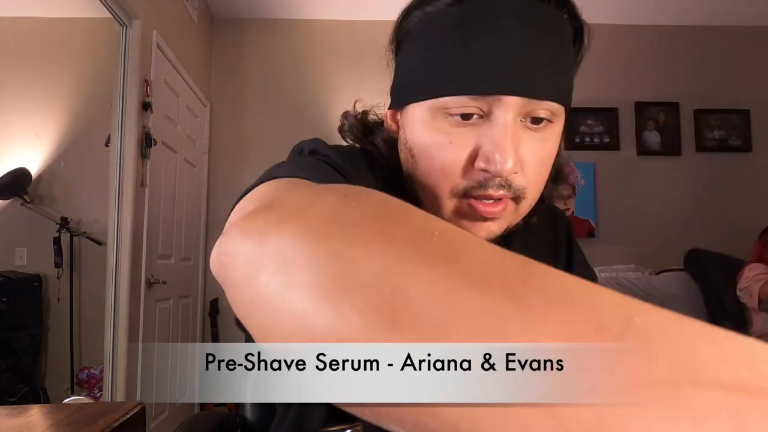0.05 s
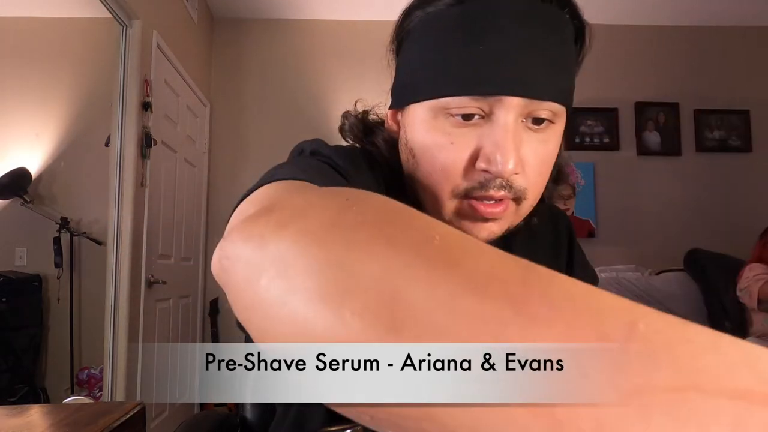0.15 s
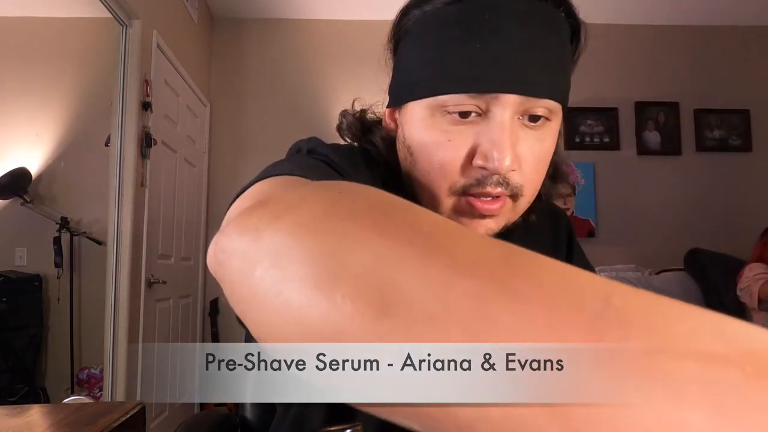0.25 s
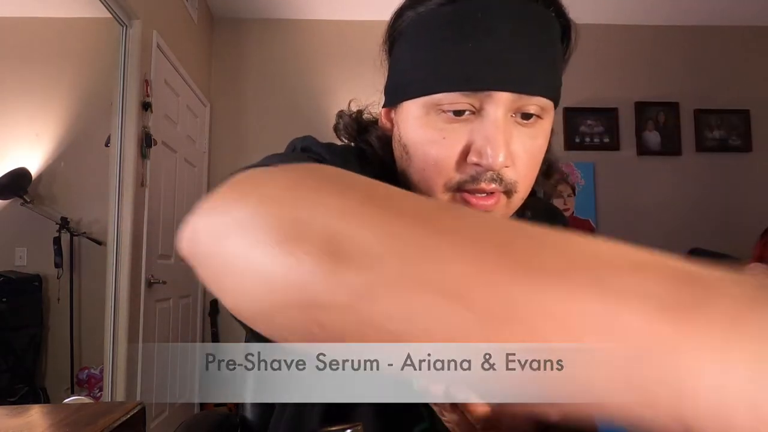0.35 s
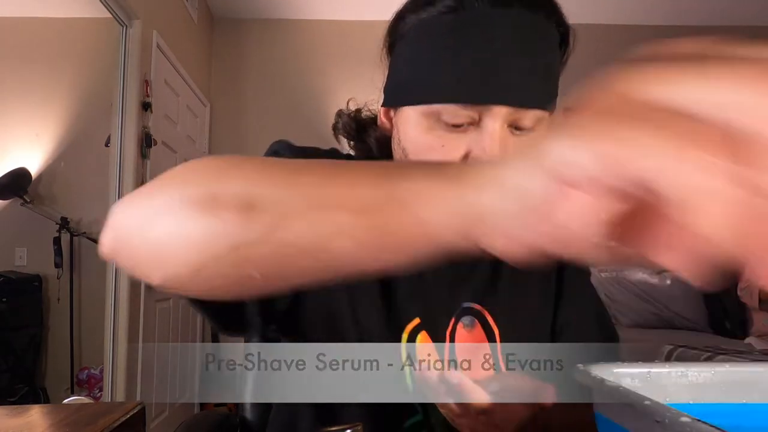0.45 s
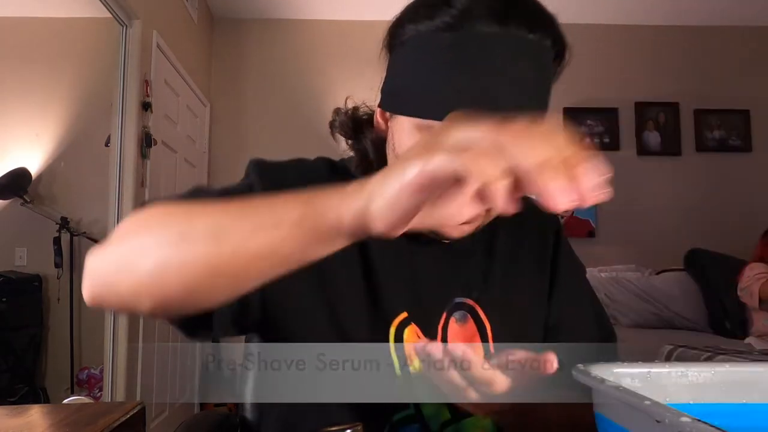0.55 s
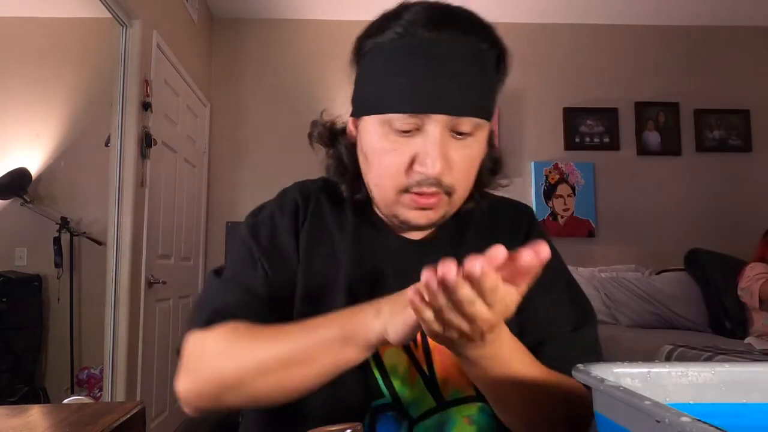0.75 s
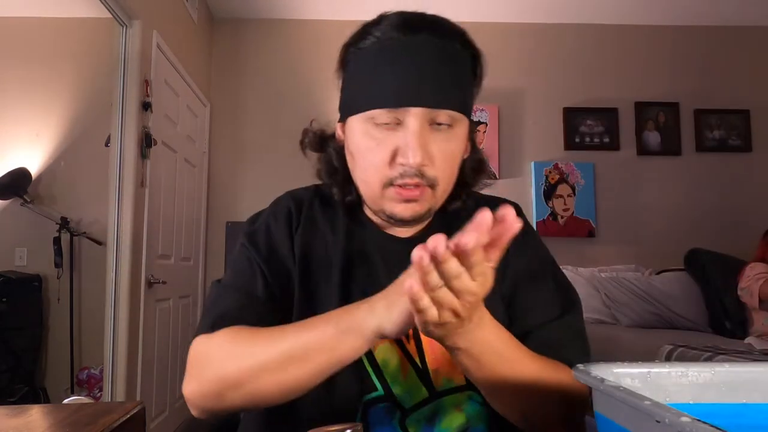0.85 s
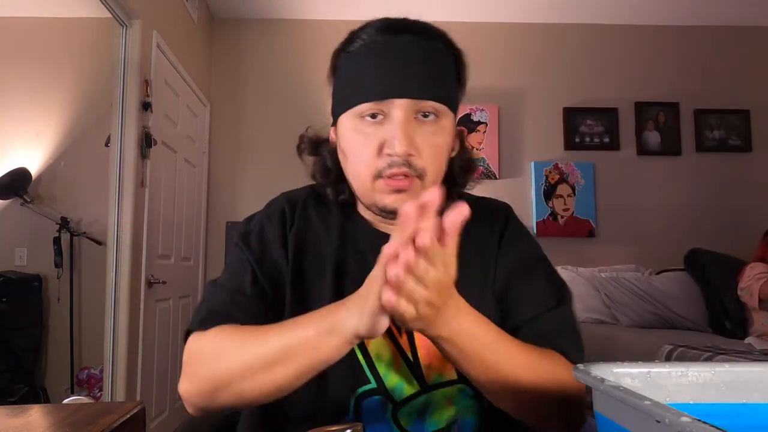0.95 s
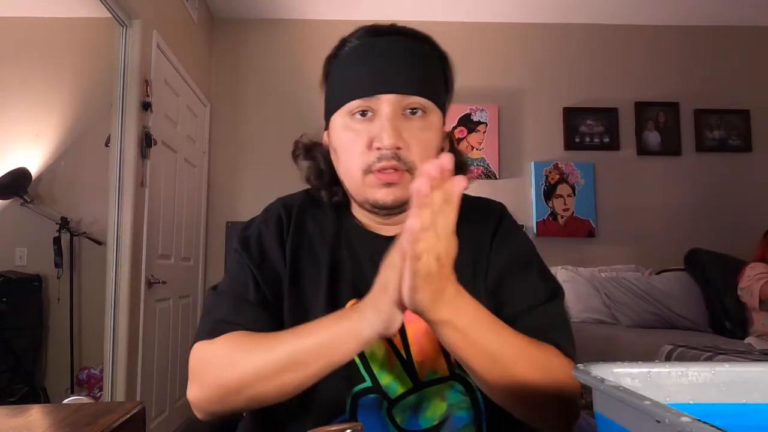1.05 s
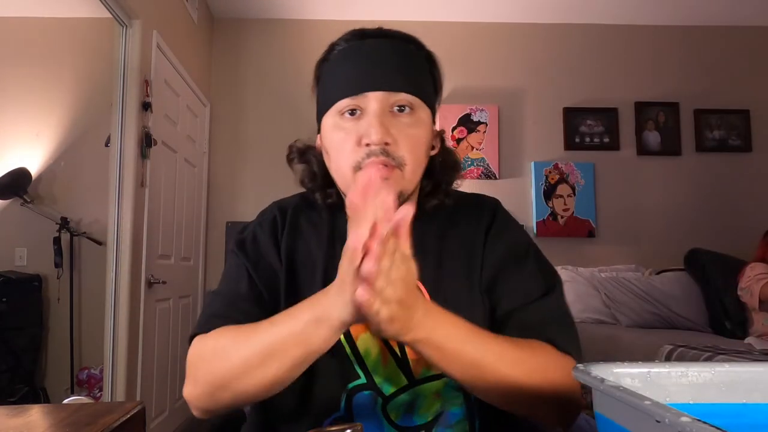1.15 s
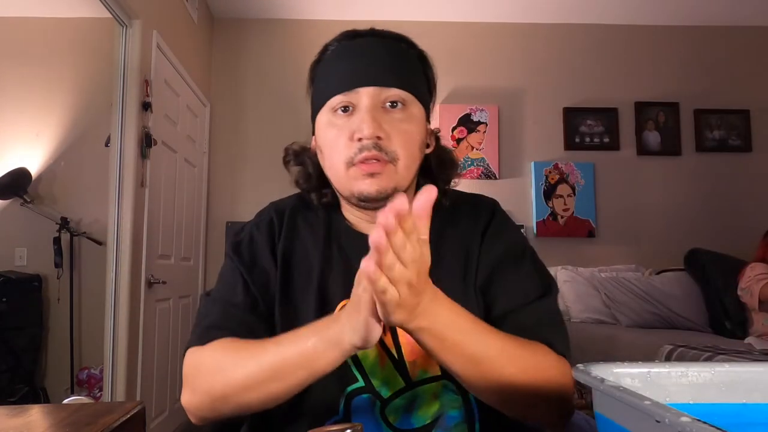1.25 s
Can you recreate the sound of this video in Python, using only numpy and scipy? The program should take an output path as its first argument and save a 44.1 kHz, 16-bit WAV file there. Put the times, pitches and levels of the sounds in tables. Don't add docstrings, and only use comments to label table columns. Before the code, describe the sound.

Loud hollow knock of a glass bottle set down on wood, several smaller wobbling thuds, a short lull, then soft wet skin rubbing with tiny liquid smacks, heard close in a quiet room.

```python
import sys
import numpy as np
from scipy import signal
from scipy.fft import rfft, irfft
from scipy.io import wavfile
from scipy.ndimage import uniform_filter1d, map_coordinates

SR = 44100
rng = np.random.default_rng(int(sys.argv[2]) if len(sys.argv) > 2 else 0)


def voltage_ratio(level):
    return 10 ** (np.asarray(level, float) / 20)


def master_out(mix):
    frames = np.transpose(np.atleast_2d(mix))
    ceiling = np.clip(frames, -1, 1)
    pcm = np.round(ceiling * 32767).astype(np.int16)
    wavfile.write(sys.argv[1], SR, pcm)


N = 57330
T = np.arange(N) / SR


def unit(x):
    return x / np.sqrt(np.mean(x ** 2) + 1e-20)


def along(points, hz):
    f, value = np.transpose(points)
    return np.interp(np.log(hz + 1), np.log(f + 1), value)


def envelope(points):
    return np.interp(T, *np.transpose(points))


def wobble(rate_hz):
    return map_coordinates(rng.standard_normal(200), [T * rate_hz])


def noise(spectrum, patchy_db):
    _, _, z = signal.stft(rng.standard_normal(N), SR, nperseg=256)
    field = uniform_filter1d(rng.standard_normal(z.shape), 4, 0)
    field = unit(uniform_filter1d(field, 8, 1))
    x = signal.istft(z * voltage_ratio(patchy_db * field), nperseg=256)[1][:N]
    colour = voltage_ratio(along(spectrum, np.fft.rfftfreq(N, 1 / SR)))
    return unit(irfft(rfft(x) * colour, N))


def ring(modes, start_s, rise_s):
    hz, db, t60_s = np.transpose(modes)[:, :, None]
    t = np.maximum(T - start_s, 0)
    sines = voltage_ratio(db - 60 * t / t60_s) * np.sin(2 * np.pi * hz * t)
    return sines.sum(0) * (1 - np.exp(-t / rise_s)) ** 2


def blips(s, gain, hz, cycles):
    length = 400
    at, t = np.round(s * SR).astype(int), np.arange(length) / SR
    u = t * (hz / cycles)[:, None] * 4
    waves = gain[:, None] * np.e * u * np.exp(-u) * np.sin(2 * np.pi * hz[:, None] * t)
    where = at[:, None] + np.arange(length)
    return np.bincount(where.ravel(), waves.ravel(), N + length)[:N]


# t/s, level/dB, thud f/Hz, hardness/dB, table drive/dB
CONTACTS = [(.102, -26.5, 473, -30, -13), (.112, -16.5, 500, -23, -32), (0.1236, -1.5, 390, 0.5, -3),
            (0.1314, -12, 329, -2.5, -15.5), (.175, -17.5, 366, -29.5, -16), (0.218, -27.5, 370, -24, 0),
            (0.2594, -16.5, 404, -11.5, 2), (0.288, -34, 300, -22, -6), (.333, -31, 300, -17, -3),
            (0.3628, -18.5, 355.4, -5.5, 1), (0.4167, -27.5, 375, 1, 9.5), (0.433, -29.5, 339, -22.5, -13),
            (0.4733, -18.5, 345, -6.5, -5), (0.49, -32, 300, 5.5, 6)]
FAVOURED_HZ = [300, 300, 218, 300, 250, 280, 160.5, 180, 200, 199, 169, 250, 262, 240]
# f/Hz, level/dB, t60/s
TABLE_LOW = [(120.7, -47.5, 0.46), (161.3, -11, 0.26), (194.1, -7.5, 0.24), (234.2, -16, 0.43),
             (286.6, -11, 0.19), (345, -21, 0.49), (369.5, 2, 0.043), (403.4, -24.5, .2)]
# f/Hz, level/dB, t60/s
TABLE_UPPER = [(486, -5.5, 0.042), (632, -16.5, 0.088), (692.3, -26.5, 0.098), (797, -20.5, .06),
               (894, -25.5, 0.14), (1016, -17, 0.043), (1200, -30, 0.067), (1300, -25, 0.064),
               (1515, -20.5, 0.035)]


def contacts():
    loss_db_per_octave = 3.5
    out = np.zeros(N)
    for (s, db, thud_hz, hard_db, drive_db), near_hz in zip(CONTACTS, FAVOURED_HZ):
        low = [(hz, level - loss_db_per_octave * abs(np.log2(hz / near_hz)), t60)
               for hz, level, t60 in TABLE_LOW]
        thud = ring([(thud_hz, 0, 0.062)], s, rise_s=0.00063)
        table = voltage_ratio(drive_db) * ring(low, s, rise_s=0.0014)
        knock = voltage_ratio(hard_db) * ring(TABLE_UPPER, s, rise_s=0.00077)
        out += voltage_ratio(db) * (thud + table + knock)
    return out


# f/Hz, level/dB
CRACK = [(600, -120), (900, 9.5), (1500, -2.5), (2800, -16.5), (4500, -23), (7000, -42), (11000, -50.5),
         (15300, -75)]


def crack():
    start_s, level_db, t60_s, rise_s = 0.1235, -19.5, 0.071, 0.00082
    t = np.maximum(T - start_s, 0)
    decay = voltage_ratio(level_db - 60 * t / t60_s) * (1 - np.exp(-t / rise_s)) ** 2
    return decay * noise(CRACK, patchy_db=0.5)


# f/Hz, level/dB, t60/s
GLASS = [(2697, -12, .05), (3946, 0, .09), (4064, -12, .13), (4650, -16, .05), (5329, -17, .13),
         (5420, -22, .1), (6670, -20, .1), (6799, -18, .13), (7800, -30, .04)]
# t/s, level/dB
CLINKS = [
    (0.1238, -42.5),
    (.136, -37),
    (.149, -36.5),
]


def clinks():
    return sum(voltage_ratio(db) * ring(GLASS, s, rise_s=0.0019) for s, db in CLINKS)


def bottle():
    high_pass = signal.butter(3, 115, "high", fs=SR, output="sos")
    return signal.sosfilt(high_pass, contacts() + crack() + clinks())


# t/s, level/dB
DRAG = [(0, -56.5), (.04, -55), (.094, -51.5), (.11, -40.5), (.125, -68.5)]
# f/Hz, level/dB
DRAG_TONE = [(400, -120), (700, -8), (1300, -4), (1520, 0), (1850, -1.5), (2400, -19), (5000, -19.5),
             (9000, -47)]


def drag():
    rough_db = 1.5 * wobble(90)
    return voltage_ratio(envelope(DRAG) + rough_db) * noise(DRAG_TONE, patchy_db=0.5)


def grains():
    count, start_s, size_db, centre_hz, spread = 500, 0.7, 1.5, 3470, 0.62
    s = start_s + rng.random(count) * (T[-1] - start_s)
    gain = voltage_ratio(-size_db * np.log(rng.random(count) + 1e-9))
    hz = np.clip(centre_hz * np.exp(spread * rng.standard_normal(count)), 800, 13000)
    return unit(blips(s, gain, hz, cycles=np.full(count, 3.5)))


# f/Hz, level/dB per Hz
SKIN = [(290, -45), (500, -9.5), (656, -9.5), (1340, 0), (1860, -7.5), (2590, -4), (6450, -12), (9490, -20),
        (15200, -32.5)]
# middle t/s, length/s, level/dB
STROKES = [
    (0.829, 0.055, -60),
    (0.942, 0.08, -59),
    (0.977, 0.049, -56),
    (1.057, 0.051, -54.5),
    (1.104, 0.06, -59.5),
    (1.159, .06, -56),
    (1.277, 0.054, -50),
]
STROKE_HZ = [1500, 1220, 5500, 2430, 6600, 2660, 2000]


def rubbing():
    contact_db, start_s, rise_s = -58.5, 0.8, 0.165
    hollow_db, hollow_q = -2.5, 2
    skin = noise(SKIN, patchy_db=0.5) + voltage_ratio(-7) * grains()
    out = voltage_ratio(contact_db) * np.clip((T - start_s) / rise_s, 0, 1) * noise(SKIN, patchy_db=5)
    for (middle_s, length_s, db), hz in zip(STROKES, STROKE_HZ):
        hollow = unit(signal.lfilter(*signal.iirpeak(hz, hollow_q, SR), skin))
        stroke = np.exp(-((T - middle_s) / (length_s / 2)) ** 2)
        out += voltage_ratio(db - 4) * stroke * (skin + voltage_ratio(hollow_db) * hollow)
    return out * voltage_ratio(2 * wobble(70))


# t/s, peak level/dB, f/Hz, length/cycles
SMACKS = [(0.8045, -55.5, 7500, 9.2), (0.9784, -38.5, 4870, 20), (0.98, -47, 3960, 20),
          (1.024, -46, 2540, 6), (1.081, -45.5, 1365, 8.6), (1.0873, -28.5, 6300, 3.2),
          (1.088, -36.5, 8850, 4.3), (1.144, -59, 2650, 8), (1.18, -51, 6000, 4), (1.189, -37.5, 4500, 3.7),
          (1.188, -51, 1500, 5), (1.24, -56, 5500, 4)]


def smacks():
    s, db, hz, cycles = np.transpose(SMACKS)
    return blips(s, voltage_ratio(db), hz, cycles)


# f/Hz, t60/s
ROOM = [(200, 0.23), (1500, 0.56), (5000, 1), (12000, 0.067)]


def room(x):
    delay_s = 0.006
    hz, t, z = signal.stft(rng.standard_normal(SR // 2), SR, nperseg=256)
    decay = voltage_ratio(-60 * t / along(ROOM, hz)[:, None])
    tail = signal.istft(z * decay, SR, nperseg=256)[1]
    late = np.pad(x, (round(delay_s * SR), 0))
    return signal.fftconvolve(late, tail / np.linalg.norm(tail))[:N]


# t/s, level/dB
SWAY = [(0, -55), (.1, -50.5), (.6, -63.5), (.8, -59.5), (1, -55), (1.15, -56.5), (1.3, -54.5)]
# f/Hz, level/dB
SWAY_TONE = [(90, -120), (120, -5), (160, -1), (200, -2.5), (280, -8), (420, -13), (600, -21), (800, -120)]


def sway():
    return voltage_ratio(envelope(SWAY) + 2.5 * wobble(32)) * noise(SWAY_TONE, patchy_db=-0.5)


# t/s, level/dB
BUMPS = [(0, -67), (.6, -74), (.72, -60), (.82, -64), (.86, -94), (1.02, -84), (1.1, -54), (1.3, -73)]
# f/Hz, level/dB
BUMP_TONE = [(15, -21.5), (30, -18.5), (60, -19), (115, -2), (150, -8), (220, -120)]


def bumps():
    return voltage_ratio(envelope(BUMPS)) * noise(BUMP_TONE, patchy_db=0)


# f/Hz, level/dB per Hz
HUM = [(88, -46), (150, -30.5), (243, -11), (307, -20.5), (379, -28.5), (460, -38.5), (1580, -27.5),
       (1710, -26), (15200, -59)]


def hum():
    return voltage_ratio(-56.5 - 3.5) * noise(HUM, patchy_db=-0.5)


def scene():
    near = bottle() + drag() + rubbing() + smacks()
    tail = voltage_ratio(-9.5) * room(near)
    return (near + tail + sway() + bumps() + hum())[None]


def top_cut(x):
    return signal.sosfilt(signal.butter(12, 15350, fs=SR, output="sos"), x)


def record(dry):
    low_pass = signal.butter(2, 12000, fs=SR, output="sos")
    mix = signal.sosfilt(low_pass, dry)
    return top_cut(mix)


dry = scene()
out = record(dry)
master_out(out)
```